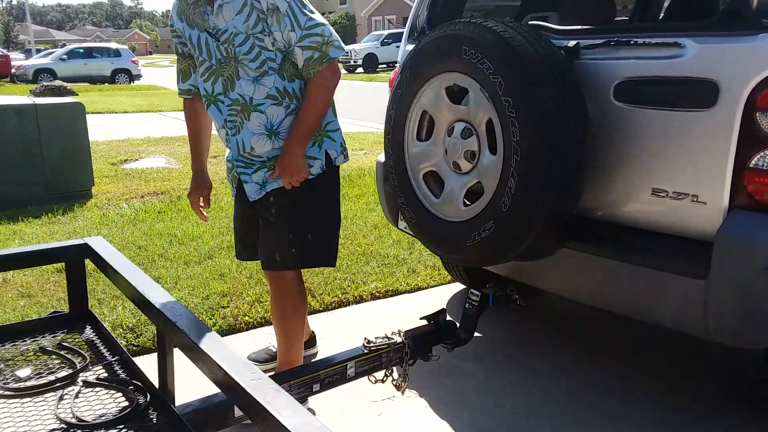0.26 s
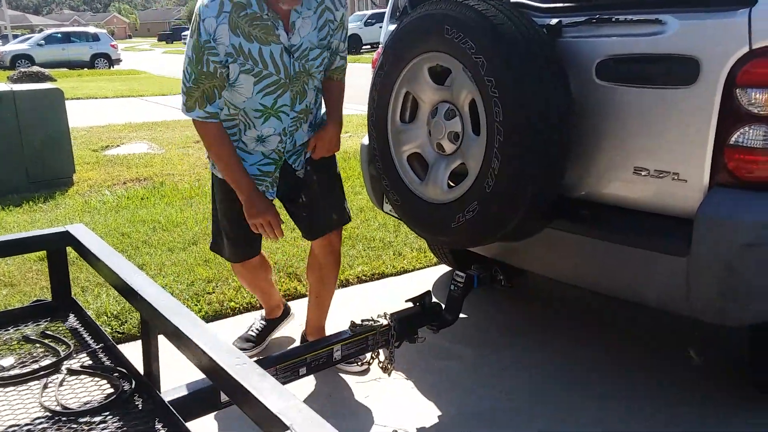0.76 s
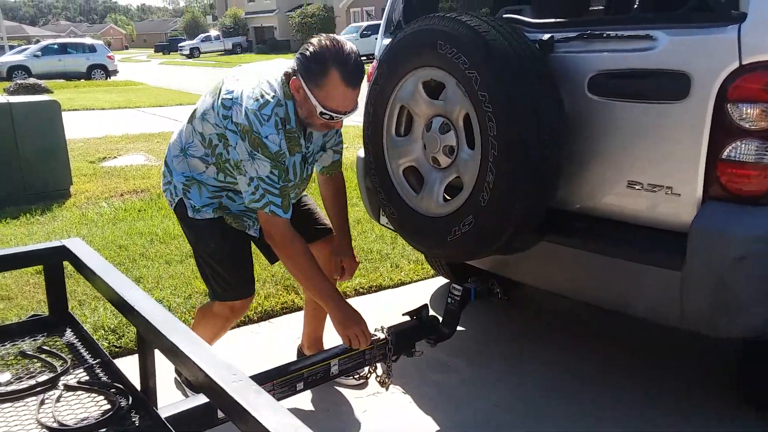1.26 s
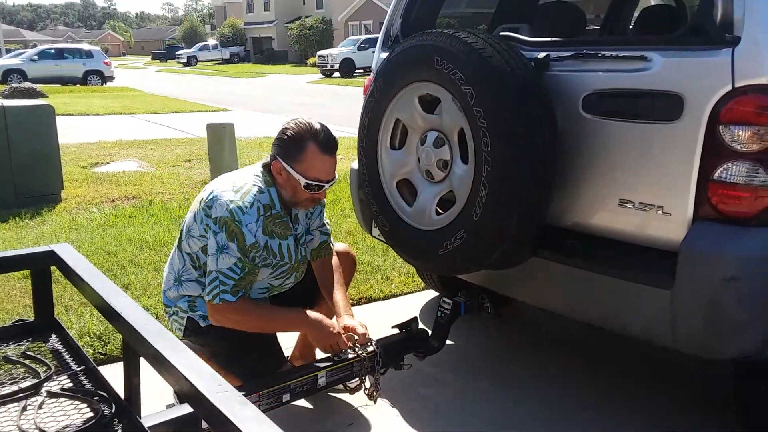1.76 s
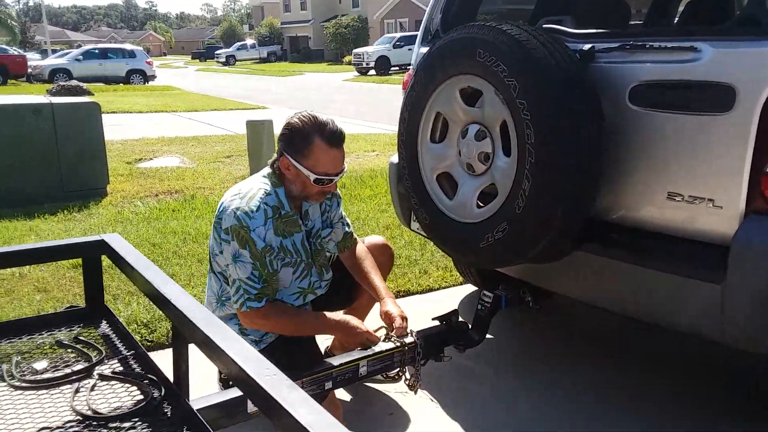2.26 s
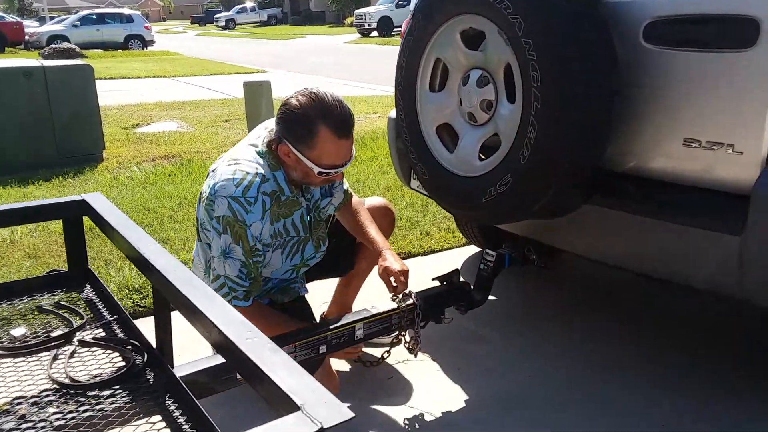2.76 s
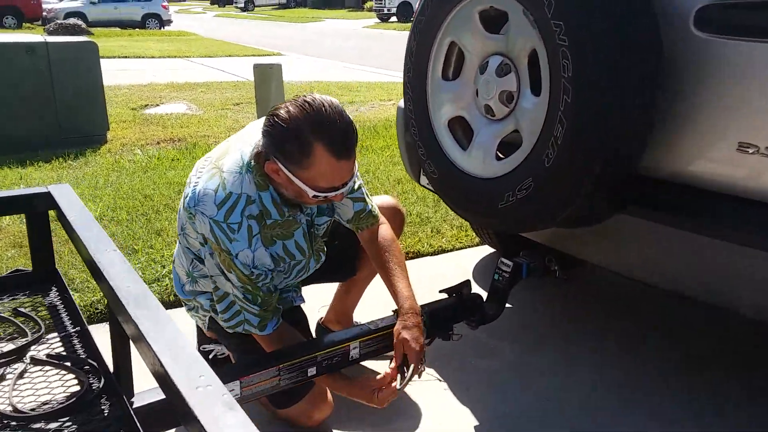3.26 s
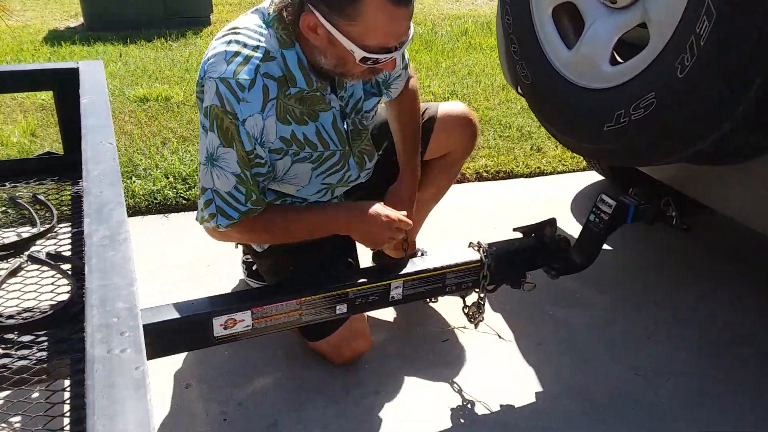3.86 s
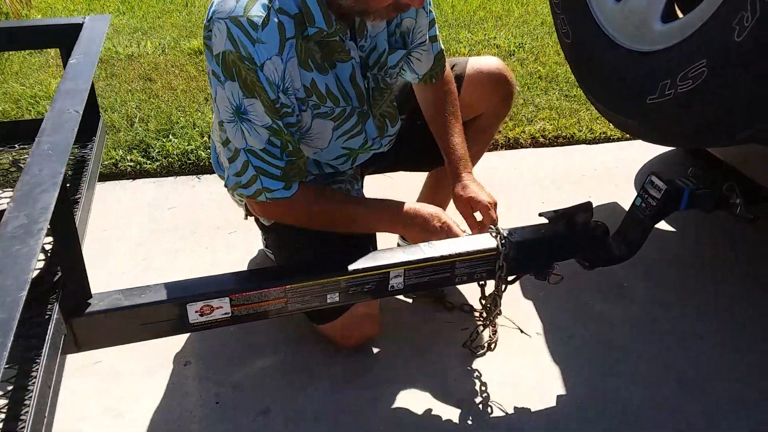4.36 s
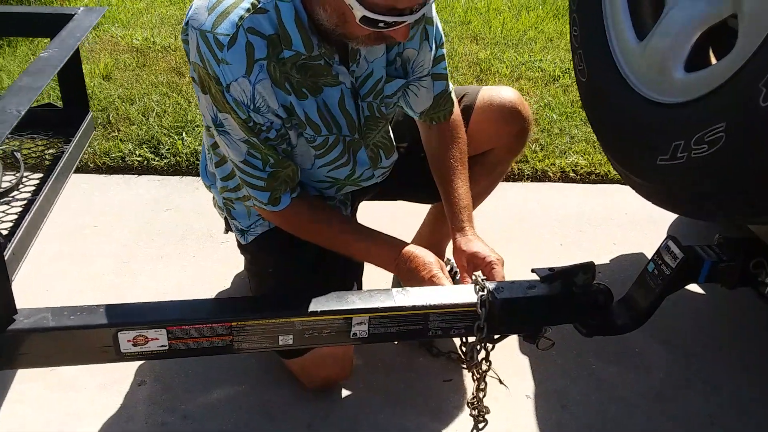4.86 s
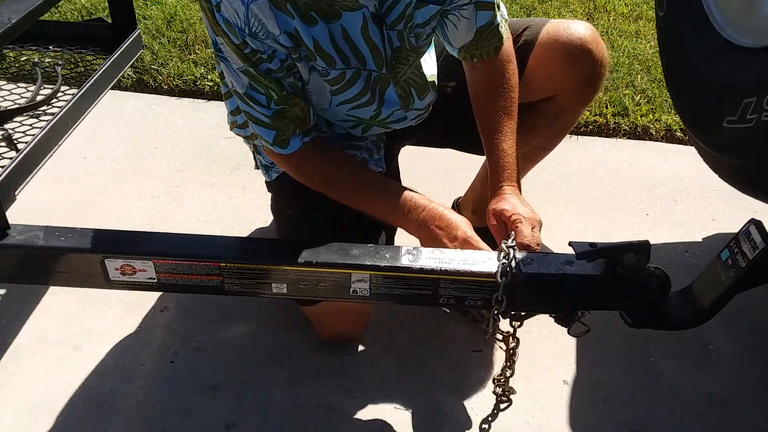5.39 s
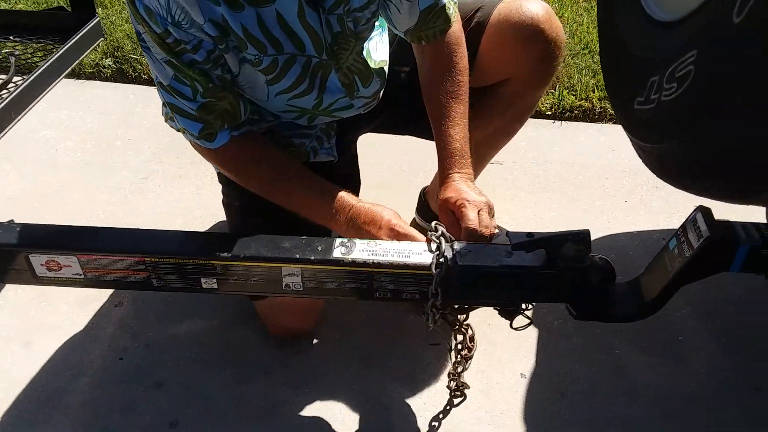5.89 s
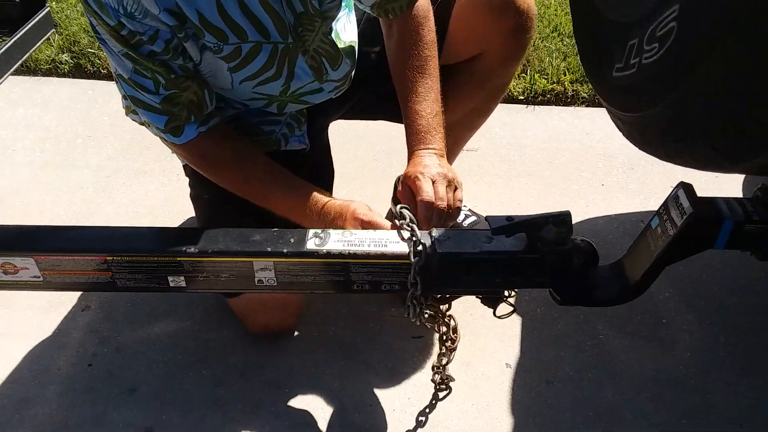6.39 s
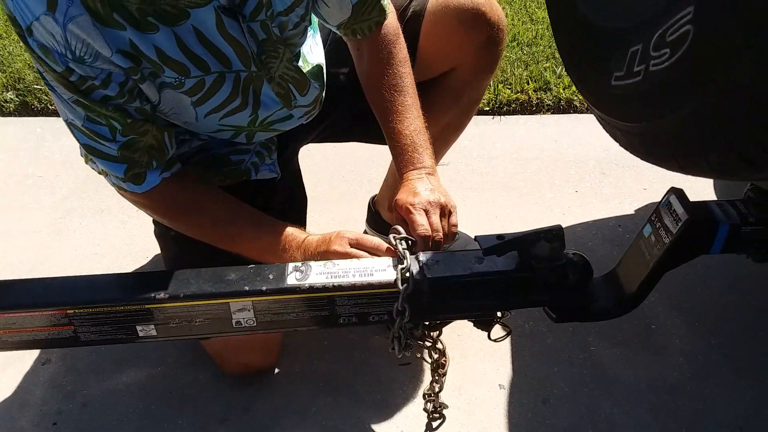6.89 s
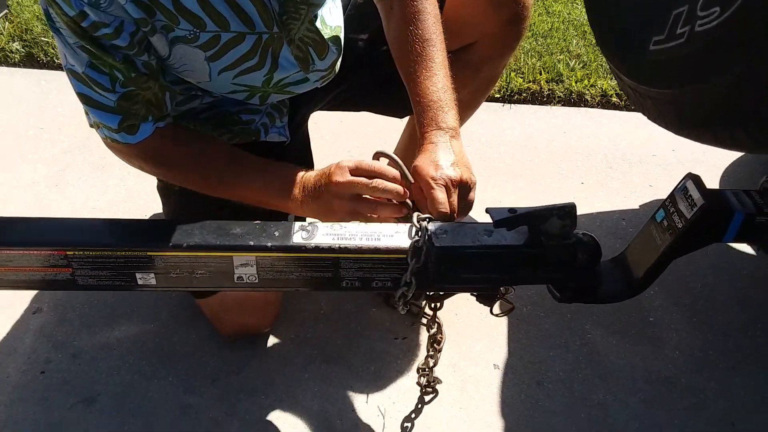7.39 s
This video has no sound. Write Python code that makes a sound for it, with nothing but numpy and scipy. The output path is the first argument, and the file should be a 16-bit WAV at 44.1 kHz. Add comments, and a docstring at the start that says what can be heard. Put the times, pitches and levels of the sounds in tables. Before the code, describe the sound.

Quiet driveway air opens with a faint low motor hum and distant street wash; dull shoe taps and tiny grit cracks come at 0.1, 0.6 and 1.1 s. From 1.3 to 1.9 s light chain knocks clink on a steel coupler while a wind puff thumps the left side. After a lull, a short scrape leads to hard clanks at 2.5 and 2.8 s, with small bright links to 3.0 s. Sparse clicks at 3.5 s, then 3.9-4.6 s brings a dense, bright jangle: sliding chain, ringing steel, high pings and a dull thud near 4.15 s. Lighter hollow-tube knocks and a soft drag follow from 4.9 s under strong wind thumps until 6.6 s, with firmer clinks at 6.1 and 6.65 s. A knock at 7.0 s precedes the loudest clattering clank at 7.3 s, decaying with a short outdoor tail.

```python
"""On a driveway, a steel chain is unwound from a trailer tongue near a hand-held camera.
Links knock the coupler and the hollow tongue, which ring in modes with noise for their dense rattle.
Clear high pings come from links and a hook, sliding chain scrapes, dull low knocks include shoe taps.
Wind noise buffets each microphone port apart; a far motor hums in sines over the noise of the street."""
import sys
import numpy as np
from scipy import signal
from scipy.fft import rfft, irfft, next_fast_len
from scipy.io import wavfile
from scipy.ndimage import uniform_filter1d, map_coordinates

SR = 44100
rng = np.random.default_rng(int(sys.argv[2]) if len(sys.argv) > 2 else 0)


def bounce(signal):
    """Save signal as a 16-bit WAV file at the path given by the first command-line argument."""
    frames = np.transpose(np.atleast_2d(signal))
    limited = np.clip(frames, -1, 1)
    pcm = np.round(limited * 32767).astype(np.int16)
    wavfile.write(sys.argv[1], SR, pcm)


N = 336924

# modes of the steel coupler: mode [Hz], level [dB], t60 [s]
COUPLER_MODES = [(958, -10, .1), (1564, -4, .14), (1770, -3, .11), (1853, -1, .12), (1971, -1, .11),
                 (2280, -4, .09), (2439, -6, .09), (2585, -9, .08), (3030, -12, .08)]
# modes of the small links: mode [Hz], level [dB], t60 [s]
LINK_MODES = [(10500, -12, .06), (10960, -9, .1), (12200, -12, .06), (13050, -9, .07), (13480, -8, .06),
              (13850, 2, .09), (15600, -8, .06)]
# rattle colour of the hollow tube, also for the coupler once unwound: pitch [Hz], relative density [dB per Hz]
TUBE_COLOUR = [(300, -16), (900, -6), (1500, -4), (2000, 0.5), (2600, 5), (3200, -1), (6000, -27.5),
               (13200, -53)]
# chain sliding over steel: start [s], rise [s], hold [s], fall [s], scrape level [dB], jingle level [dB]
SLIDES = [(.84, .02, 0.19, 0.037, -92, -61), (1.181, 0.16, 0.11, 0.15, -54.5, -44),
          (2.283, 0.2, 0.0085, 0.013, -43.5, -64), (4.111, 0.033, 0.034, 0.18, -36, -34.5),
          (5.38, 0.39, 0.022, 0.25, -47, -62.5)]


def amp(db):
    """Amplitude ratio of a level in dB."""
    return 10 ** (np.asarray(db) / 20)


def unit(x):
    """Scale to rms 1."""
    return x / np.sqrt(np.mean(x ** 2) + 1e-20)


def along(points, hz):
    """Read (Hz, value) points on a log frequency axis."""
    f, v = np.transpose(points)
    return np.interp(np.log(hz + 1), np.log(f + 1), v)


def curves(rows):
    """One value per sample for each column after the time."""
    s, *cols = np.transpose(rows)
    return [np.interp(np.arange(N) / SR, s, c) for c in cols]


def wobble(rate):
    """A smooth random curve, rate knots a second."""
    knots = rng.standard_normal(int(N * rate / SR) + 4)
    return map_coordinates(knots, [np.arange(N) * rate / SR])


def filtered(x, response):
    """Shape x by a complex response of frequency."""
    m = next_fast_len(N + SR // 2)
    return irfft(rfft(x, m) * response(np.fft.rfftfreq(m, 1 / SR)), m)[..., :N]


def noise(spectrum, channels=1):
    """Coloured noise of rms 1."""
    white = rng.standard_normal((channels, N))
    return unit(filtered(white, lambda hz: amp(along(spectrum, hz))))


def sides(db):
    """Left and right gains for a level difference."""
    return amp(np.array([db / 2, -db / 2]))


def add(out, s, sound):
    """Mix a sound in at time s."""
    i = max(round(s * SR), 0)
    out[..., i:i + sound.shape[-1]] += sound[..., :N - i]


def strike(out, s, sound):
    """Each contact gets a random short noise tail at each port and a small random shift of the right port."""
    t = np.arange(SR // 40) / SR
    tails = rng.standard_normal((2, len(t))) * amp(-60 * t / 0.029) * (t > .001)
    tails = amp(-4.5) * tails / np.linalg.norm(tails[0])
    left, right = signal.fftconvolve(sound[None], tails, axes=1)[:, :len(sound)]
    add(out[0], s, sound + left)
    add(out[1], s + rng.normal(0, .00007), sound + right)


def ring(modes, t, scatter_db, loose=1):
    """One blow rings every mode at a new strength and slightly off pitch; loose contact makes it flutter."""
    hz, db, t60 = np.transpose(modes)[:, :, None]
    strength, start_phase, detune = rng.standard_normal((3, len(modes), 1))
    jitter = rng.standard_normal((len(modes), len(t)))
    flutter = np.cumsum(jitter, axis=1) * 0.029 * loose * np.sqrt(hz / 2000)
    phase = 2 * np.pi * hz * (1 + 0.0021 * loose * detune) * t + start_phase + flutter
    return np.sum(amp(db + scatter_db * strength - 60 * t / t60) * np.sin(phase), axis=0)


def knocks(hits, modes, ring_db, rattle_db, snap_db, t60, colour):
    """Each knock rings the steel, sets off its many dense modes as a rattle, and snaps in the treble."""
    # colour of the treble snap: pitch [Hz], relative density [dB per Hz]
    snap_colour = [(1760, -27), (3000, 5.5), (3730, -3.5), (4110, 1), (5800, -7), (12100, -18),
                   (16000, -28)]
    # clear ring lost per dB of blow and per dB of treble; its decay once the next link lands
    damp_per_db, glance_per_db, stopped_t60_s = .14, .15, .09
    out, t = np.zeros((2, N)), np.arange(SR // 3) / SR
    # loose links chatter on after the blow, so rattle and snap come in lumps
    rattle, snap = (unit(amp(2.7 * wobble(120)) * noise(shade)[0]) for shade in (colour, snap_colour))

    def fade(t60):
        """A hard first contact, then the slower decay."""
        return (1 - np.exp(-t / 0.00087)) * (amp(-60 * t / t60) + 1.4 * amp(-60 * t / 0.009))

    def even(shape, x):
        """Give the faded noise the energy of the fade alone, whatever the stretch of noise."""
        return unit(shape * x) * np.sqrt(np.mean(shape ** 2))

    gaps = np.diff([hit[0] for hit in hits], append=N / SR)
    for (s, db, treble_db), gap in zip(hits, gaps):
        i = rng.integers(N - len(t))
        # heavy blows leave chain lying on the steel, which damps the clear modes;
        # bright glancing blows ring less
        clear_db = ring_db - damp_per_db * db - glance_per_db * treble_db
        clear_db = clear_db - 60 * np.maximum(t - gap, 0) / stopped_t60_s
        body = amp(rattle_db) * even(fade(t60), rattle[i:i + len(t)])
        body += amp(clear_db) * ring(modes, t, scatter_db=2.0)
        # the treble dies faster than the body
        top = amp(snap_db + treble_db) * even(fade(0.55 * t60), snap[i:i + len(t)])
        strike(out, s, amp(db) * (body + top))
    return out


def coupler_knocks():
    """Chain knocks the coupler; once it is unwound one mode rings longer and above the others."""
    # chain knocks on the coupler: start [s], level [dB], treble [dB]
    coupler_hits = [(1.3328, -33, -34), (1.3576, -28.5, -25), (1.395, -29, -17), (1.4186, -25.5, -16),
                    (1.442, -22, -18), (1.5437, -40, -32), (1.6478, -32, -22), (1.72, -28.5, -16.5),
                    (1.7741, -35, -16.5), (1.8362, -37, -35), (1.907, -38.5, -37), (2.2988, -33.5, -25),
                    (2.434, -30, -20), (2.5105, -10, -15), (2.5663, -15, -8), (2.7181, -29.5, -28),
                    (2.766, -35, -35), (2.7988, -14.5, -16), (2.8997, -33.5, -17), (2.9466, -22, -30),
                    (3.8728, -38, -2.5), (3.8868, -19, -9.5), (3.898, -16, -12), (3.929, -17.5, -12.5),
                    (4.0259, -19.5, -12), (4.0637, -19, -15), (4.1486, -31, -5), (4.2104, -46, 4),
                    (4.2637, -23, -9.5), (4.4567, -24.5, -6.5), (4.4932, -29.5, -7), (4.5648, -32.5, -19.5)]
    # rattle colour while the chain is wound: pitch [Hz], relative density [dB per Hz]
    wound_colour = [(180, -61), (300, -18), (900, -5.5), (1350, 0.5), (1700, 4), (2400, 4), (2900, -3),
                    (6000, -35), (7800, -23), (13200, -120)]
    unwound_s, bell_hz, bell_db, bell_t60_s = 3.5, 1564, 6, .4
    wound = [hit for hit in coupler_hits if hit[0] <= unwound_s]
    unwound = [hit for hit in coupler_hits if hit[0] > unwound_s]
    free = [(hz, bell_db, bell_t60_s) if hz == bell_hz else (hz, db, t60)
            for hz, db, t60 in COUPLER_MODES]
    early = knocks(wound, COUPLER_MODES, ring_db=-20.5, rattle_db=-10.0, snap_db=1.5,
                   t60=0.14, colour=wound_colour)
    late = knocks(unwound, free, ring_db=-21.5, rattle_db=-11.5, snap_db=2.0,
                  t60=0.14, colour=TUBE_COLOUR)
    return early + late


def tongue_knocks():
    """Chain knocks the hollow tongue, whose tube modes start lower and mostly ring longer."""
    # chain knocks on the tongue tube: start [s], level [dB], treble [dB]
    tongue_hits = [(4.8753, -40.5, -9), (4.949, -46.5, -14), (5.1113, -32.5, -8.5), (5.1562, -32.5, -13.5),
                   (5.6715, -27.5, -39), (5.8122, -34.5, -9.5), (5.8616, -37.5, -16.5), (6.0646, -38.5, -8),
                   (6.0911, -19, -22), (6.2262, -37, -11.5), (6.2517, -37, -15), (6.2886, -23.5, -15),
                   (6.3335, -30.5, -17.5), (6.5425, -23, -35), (6.6263, -35.5, -8), (6.6543, -23.5, -8),
                   (6.7271, -32.5, -19), (6.8394, -29, -32), (6.9531, -34, -35), (6.9671, -17.5, -18.5),
                   (7.0409, -35.5, -18), (7.0900, -24, -34), (7.235, -35.5, -29), (7.2724, -22, -9),
                   (7.2925, 0, -18), (7.324, -13.5, -12), (7.3362, -10.5, -16), (7.3834, -38, -2.5),
                   (7.5882, -39, -22)]
    # modes of the tube: mode [Hz], level [dB], t60 [s]
    tongue_modes = [(370, -20, .18), (770, -18, .2), (935, -16, .2), (1287, -12, .12), (1592, 0, .21),
                    (1650, -1, .14), (2263, -3, .14), (2445, -7, .1), (2640, -4, .11), (2835, -8, .1),
                    (2951, -8, .1), (3481, -12, .1)]
    return knocks(tongue_hits, tongue_modes, ring_db=-18.5, rattle_db=-12.0, snap_db=2.5,
                  t60=0.11, colour=TUBE_COLOUR)


def jingles():
    """Small links click and ring high, each contact with other mode strengths."""
    # links touching links: start [s], level [dB], ring level before the blow [dB]
    link_hits = [ (1.442, -31, -10), (1.647, -35, -17), (2.4443, -42.5, -4), (2.5645, -32, -2),
                 (2.6844, -46, -7), (2.917, -27, -7), (3.0169, -37, -25.5), (3.473, -48, -13),
                 (3.51, -39.5, -15), (3.888, -19, -15), (3.9239, -19, -43), (4.026, -25, -39),
                 (4.128, -38, -23), (4.1526, -17, -14), (4.168, -16.5, -9), (4.317, -36, -15),
                 (4.427, -40, -16), (4.4537, -19, -34), (4.524, -37, -28), (5.2675, -56, -2),
                 (5.403, -47, -8), (6.276, -27.5, -23), (6.6554, -17, -14.5), (6.755, -45, -16)]
    out, t = np.zeros((2, N)), np.arange(SR // 4) / SR
    click = noise([(4000, -0.5), (8000, 7.5), (12000, 4.0), (16000, -12)])[0]
    for s, db, ring_db in link_hits:
        i = rng.integers(N - len(t))
        sound = amp(-6.5 - 60 * t / 0.037) * click[i:i + len(t)]
        sound += amp(ring_db) * ring(LINK_MODES, t, scatter_db=4.0)
        strike(out, s, amp(db) * (1 - np.exp(-t / 0.00017)) * sound)
    return out


def high_pings():
    """Hook and small links ping clear and high, each blow favouring the modes near one pitch."""
    # modes of clear high pings, from hook and small links: mode [Hz], level [dB], t60 [s]
    ping_modes = [(3530, 0, .13), (4105, 0, .12), (5740, 0, .1), (6110, 0, .08), (11170, 0, .09)]
    # the pings: start [s], level [dB], favoured pitch [Hz]
    ping_hits = [(2.916, -33.5, 6500), (4.17, -22.5, 5740), (4.171, -27, 4105), (4.286, -35.5, 4105),
                 (4.317, -36.5, 11170), (4.348, -50.5, 3530)]
    favour_db_per_octave = 85
    out, t = np.zeros((2, N)), np.arange(SR // 4) / SR
    for s, db, favoured in ping_hits:
        modes = [(hz, level - favour_db_per_octave * abs(np.log2(hz / favoured)), t60)
                 for hz, level, t60 in ping_modes]
        strike(out, s, amp(db) * ring(modes, t, scatter_db=1.5, loose=1.8))
    return out


def ticks(count):
    """Many tiny dry contacts of the handled chain at random moments, each with its own low edge."""
    first_s, last_s = 1.2, 7.5
    loudest_db, scatter_db, t60_s = -52.5, 0.5, 0.012
    out, t = np.zeros((2, N)), np.arange(SR // 30) / SR
    for when, size, edge in rng.random((count, 3)):
        level_db = loudest_db + scatter_db * np.log(1 - .95 * size)
        burst = rng.standard_normal(len(t)) * amp(level_db - 60 * t / t60_s)
        high = signal.butter(2, 1500 + 4500 * edge, "high", fs=SR)
        strike(out, first_s + (last_s - first_s) * when, signal.lfilter(*high, burst))
    return out


def resonances(modes, width):
    """Response of modes under steady rubbing; a larger width broadens every resonance."""
    def response(f):
        return sum(amp(db) * 1j * f * (width / t60) / (c * c - f * f + 1j * f * width / t60)
                   for c, db, t60 in modes)
    return response


def slide_gain(levels_db, edge_db):
    """Every slide swells from edge_db below its level, holds and fades."""
    t = np.arange(N) / SR
    shapes = [np.interp(t, np.cumsum(row[:4]), db - edge_db * np.array([1, 0, 0, 1]), -120, -120)
              for row, db in zip(SLIDES, levels_db)]
    return uniform_filter1d(amp(np.max(shapes, axis=0)), size=400)


def drag():
    """Uneven slips of the sliding chain drive the steel and the links."""
    slips = rng.standard_normal((2, N)) * amp(3.9 * np.array([wobble(250), wobble(160)]))
    steel = unit(filtered(slips[0], resonances(COUPLER_MODES, width=22)))
    link_response = resonances(LINK_MODES, width=4)
    # a little broad treble lies under the modes of the links
    links = unit(filtered(slips[1], lambda f: link_response(f) + 0.017 / (1 + (8000 / (f + 1)) ** 6)))
    scrape_db, jingle_db = np.transpose(SLIDES)[4:]
    return slide_gain(scrape_db, edge_db=30.5) * steel + slide_gain(jingle_db, edge_db=22.5) * links


def low_knocks():
    """Shoe taps and a thud are short dull sines with a scuff of noise; grit cracks under the soles."""
    # dull low knocks: shoe taps, and at 4.149 s a thud amid the chain knocks: start [s], level [dB], pitch [Hz]
    dull_hits = [(0.096, -31.5, 442), (0.625, -29.5, 283), (1.085, -23.5, 526), (4.149, -24, 850)]
    # grit cracking under the soles: start [s], level [dB]
    cracks = [(0.029, -46.5), (.083, -48), (0.282, -40), (0.622, -43), (0.987, -47.5)]
    out, t = np.zeros((2, N)), np.arange(SR // 10) / SR
    grit = noise([(300, -4), (1200, 6.0), (3000, -6.5), (16000, -28)])[0]

    def burst(t60):
        """A random stretch of grit noise, dying away."""
        i = rng.integers(N - len(t))
        return unit(grit[i:i + len(t)]) * amp(-60 * t / t60)

    for s, db, hz in dull_hits:
        knock = np.sin(2 * np.pi * hz * t) * amp(-60 * t / 0.029) + amp(-38) * burst(0.079)
        add(out, s, amp(db) * (1 - np.exp(-t / 0.00021)) * knock * np.ones((2, 1)))
    for s, db in cracks:
        strike(out, s, amp(db) * burst(0.034))
    return out


def wind():
    """Lumpy turbulence, unrelated between the ports, with single puffs on top."""
    # strength of the wind: time [s], buffet level [dB], left-right difference [dB]
    gusts = [(0, -44.5, 2), (1.1, -43, 0), (1.4, -36.5, -0.5), (2.1, -45, -1.5), (2.45, -39.5, -9),
             (3.6, -41, -1), (4.21, -40, -6.5), (4.245, -27, -9.5), (4.33, -24, -4), (4.4, -44.5, -1),
             (4.6, -40.5, 6), (4.78, -26, -3), (5.1, -37, 4.5), (5.45, -38.5, -3.5), (5.8, -24, -2),
             (6.2, -30, -2.5), (6.5, -31, -5), (6.9, -49, -0.5), (7.64, -53.5, -10)]
    # single puffs on a port: time [s], level [dB], left-right difference [dB]
    puffs = [(1.307, -10, 27), (2.428, -25.5, -7), (2.478, -12.5, -21), (3.699, -23, -16),
             (4.243, -19, -15), (4.851, -16, 22), (5.037, -19, -25), (5.594, -8.5, -35), (5.791, -10, -31),
             (5.89, -10.5, -26), (5.929, -21, 7), (6.146, -17, -24), (6.455, -18, -18), (6.57, -17, -24)]
    # colour of the turbulence: pitch [Hz], relative density [dB per Hz]
    buffet_colour = [(15, -78), (36, -6), (81, 8.5), (145, 2), (249, -7.5), (291, -13.5), (522, -32.5),
                     (1000, -120)]
    level_db, pan = curves(gusts)
    lumps = amp(4.6 * np.array([wobble(22), wobble(22)]))
    out = amp(level_db) * sides(pan) * unit(lumps * noise(buffet_colour, channels=2))
    t = np.arange(SR // 20) / SR - .01
    # one pressure swing of about a cycle and a half, with a sharp edge in the middle
    swing = np.sin(2 * np.pi * 170 * t + 1.88) * np.exp(-(t / 0.0024) ** 2)
    swing -= 0.088 * np.sin(2 * np.pi * 480 * t) * np.exp(-(t / 0.002) ** 2)
    for s, db, pan in puffs:
        # the louder port takes the full level
        gains = sides(pan) / sides(pan).max()
        add(out, s + t[0], amp(db) * swing * gains[:, None])
    return out


def motor():
    """Low orders of a far motor as sines, slightly unsteady in pitch and level."""
    # orders of the hum: pitch [Hz], rms level before the fade [dB]
    orders = [(100, -46.5), (150, -54.5), (252, -58.5), (358, -69)]
    # slow rise and fall of the hum: time [s], gain [dB]
    hum_fade = [(0, -2), (6.6, 4), (7.1, -9.5), (7.64, -4)]
    t = np.arange(N) / SR
    drift = np.cumsum(0.01191 * wobble(3)) / SR
    fade_db = curves(hum_fade)[0]
    return sum(np.sqrt(2) * amp(db + fade_db + 1.85 * wobble(6.3)) * np.sin(2 * np.pi * hz * (t + drift))
               for hz, db in orders)


def street():
    """Traffic and leaves far off as wide noise, swelling a little."""
    # colour of the street: pitch [Hz], relative density [dB per Hz]
    street_colour = [(120, -49), (200, 2.5), (300, -5), (600, -10), (900, -7.5), (1300, -13.5),
                     (2550, -13.5), (3150, -27), (4200, -26.5), (9000, -35.5), (16000, -43)]
    # likeness of the two ports: pitch [Hz], left-right correlation [0-1]
    likeness = [(200, 1), (700, 0.16), (3000, 0.034), (12000, .1)]
    pair = rng.standard_normal((2, N))

    def response(hz):
        """Share the noise between mid and side so that the ports are as alike as the table says."""
        turn = np.arccos(np.clip(along(likeness, hz), -1, 1)) / 2
        return amp(along(street_colour, hz)) * [np.cos(turn), np.sin(turn)]

    mid, side = filtered(pair, response)
    return amp(-53.5 + 1.8 * wobble(5.4)) * unit(np.array([mid + side, mid - side]))


def yard(x, t60):
    """The houses return a short tail, different at each port."""
    t = np.arange(SR // 3) / SR
    tail = rng.standard_normal((2, len(t))) * amp(-60 * t / t60) * (t > .001)
    wet = signal.fftconvolve(x, tail / np.linalg.norm(tail[0]), axes=1)[:, :N]
    return filtered(wet, lambda hz: 1 / (1 + 1j * hz / 9000))


def scene():
    """The chain work near the microphone, its tail from the yard, then low knocks, wind, motor and street."""
    # left port ahead of the right for the steel: pitch [Hz], phase [radians]
    lead = [(0, 0), (1500, .9), (2400, 1.13), (4000, 4.5), (16000, 25)]
    steel = coupler_knocks() + tongue_knocks() + jingles() + high_pings() + ticks(count=45) + drag()
    pair = steel * sides(-1.44)[:, None]
    # each port is turned by half the lead
    halves = np.array([[.5j], [-.5j]])
    near = filtered(pair, lambda hz: np.exp(halves * np.interp(hz, *np.transpose(lead))))
    return near + amp(-10.0) * yard(pair, t60=0.39) + low_knocks() + wind() + motor() + street()


def record(dry):
    """The microphone drops the deepest bass, the input stage rounds off peaks, the treble is cut off."""
    top_hz = 15850
    thinned = filtered(dry, lambda hz: (1j * hz / (45 + 1j * hz)) ** 2)
    rounded = thinned / (1 + np.abs(thinned / 1.1) ** 4) ** .25
    return filtered(rounded, lambda hz: hz < top_hz)


dry = scene()
out = record(dry)
bounce(out)
```